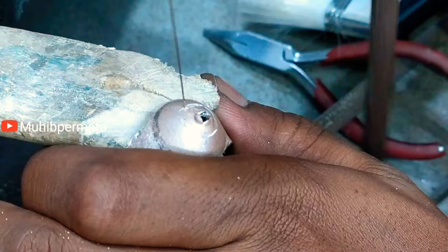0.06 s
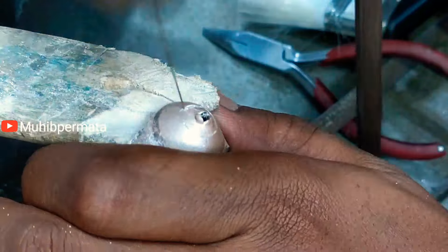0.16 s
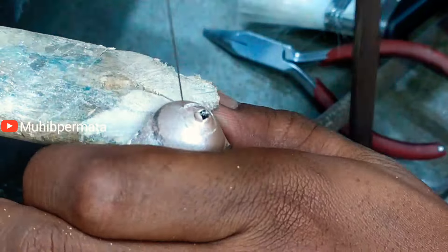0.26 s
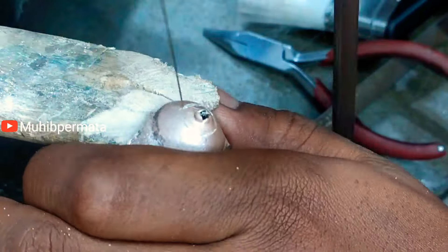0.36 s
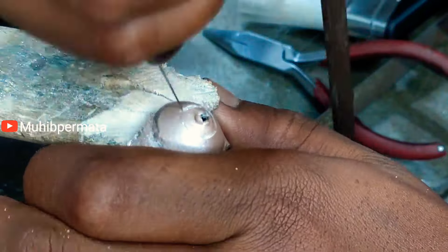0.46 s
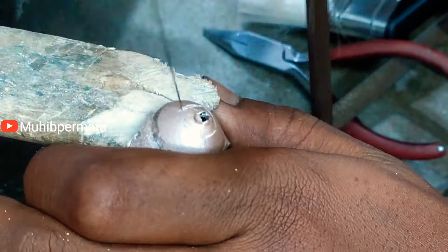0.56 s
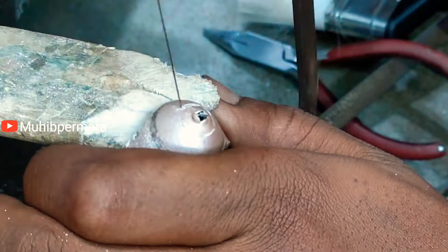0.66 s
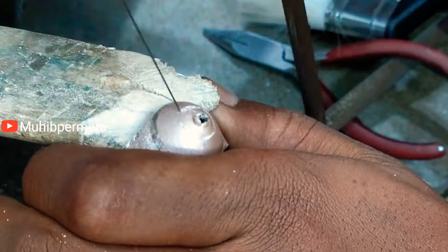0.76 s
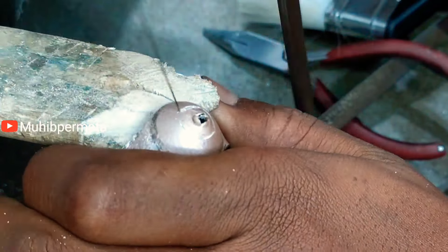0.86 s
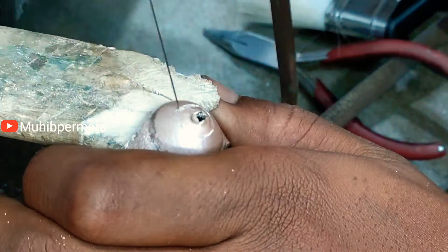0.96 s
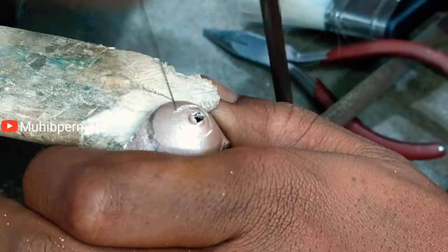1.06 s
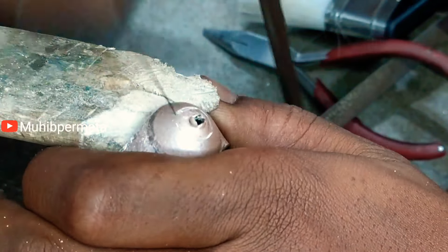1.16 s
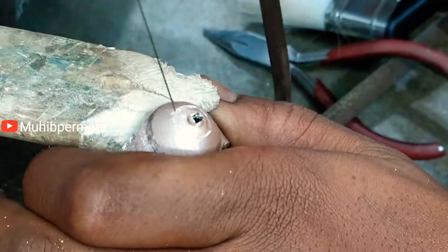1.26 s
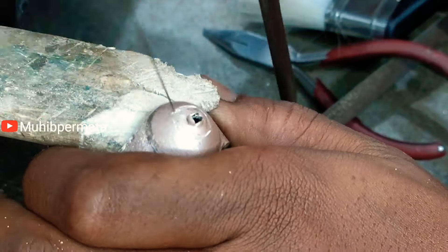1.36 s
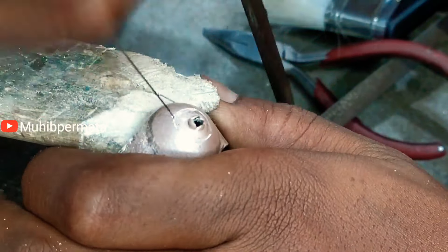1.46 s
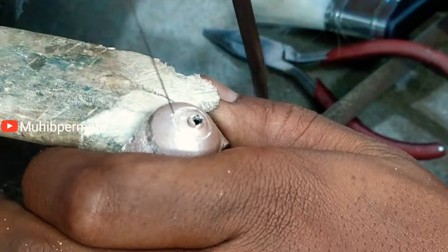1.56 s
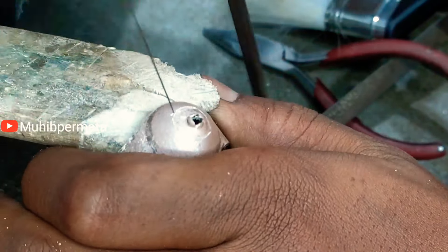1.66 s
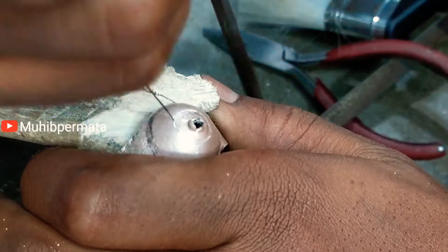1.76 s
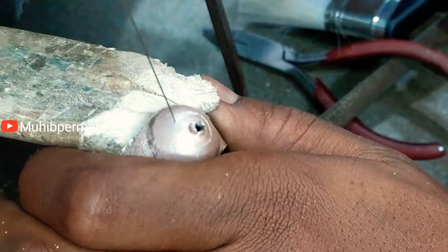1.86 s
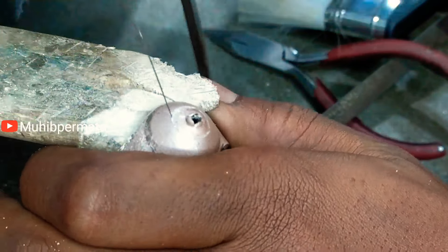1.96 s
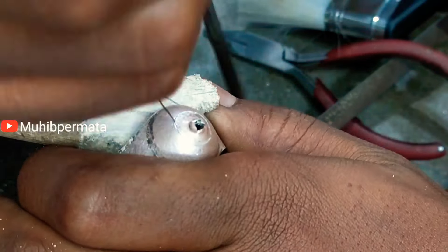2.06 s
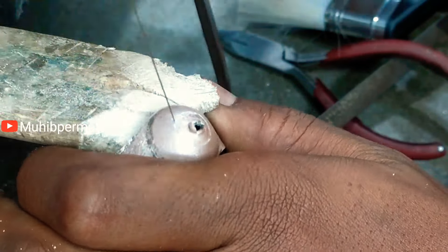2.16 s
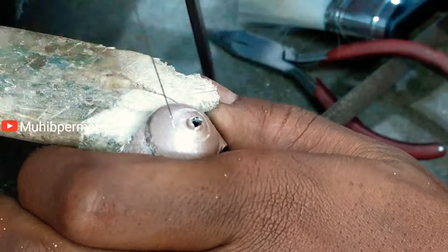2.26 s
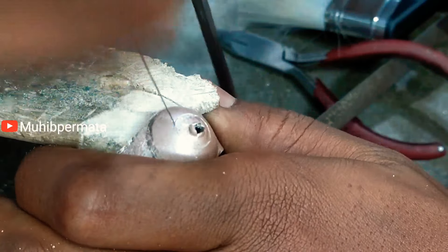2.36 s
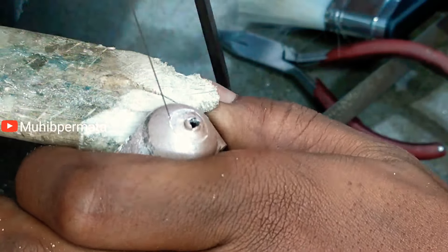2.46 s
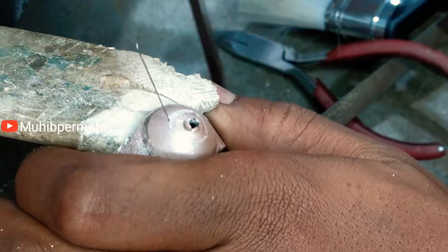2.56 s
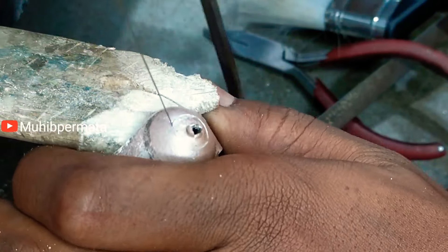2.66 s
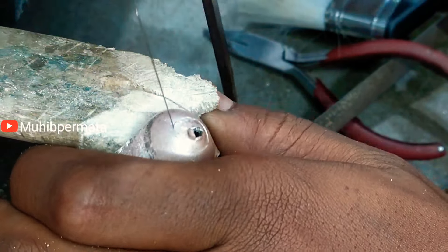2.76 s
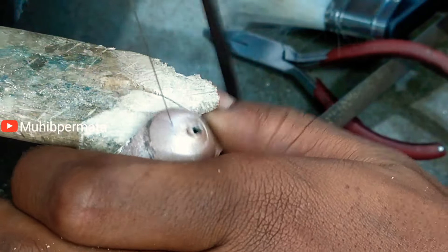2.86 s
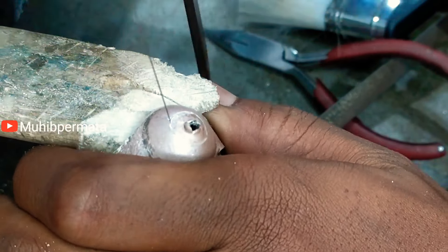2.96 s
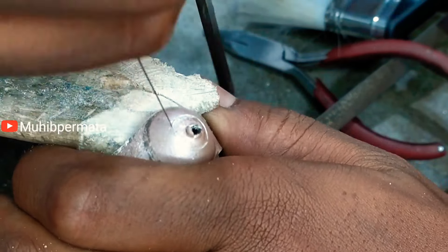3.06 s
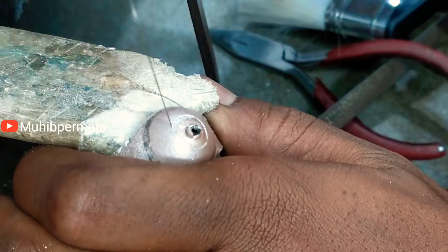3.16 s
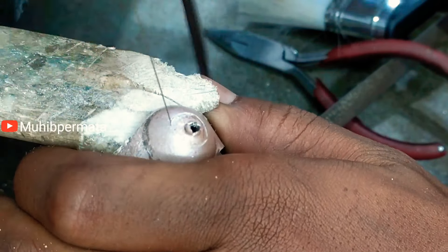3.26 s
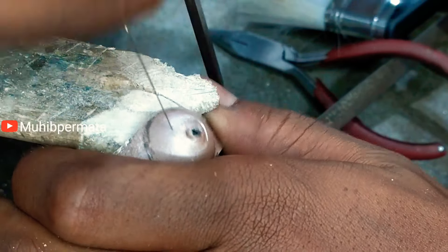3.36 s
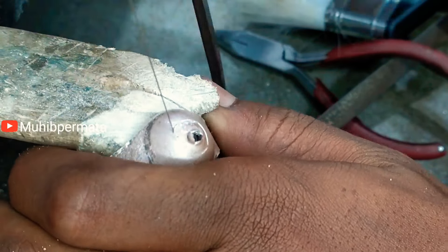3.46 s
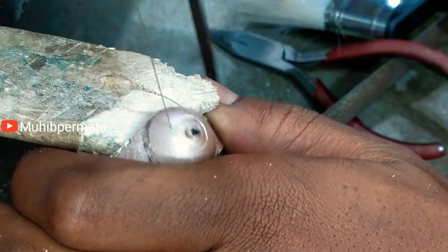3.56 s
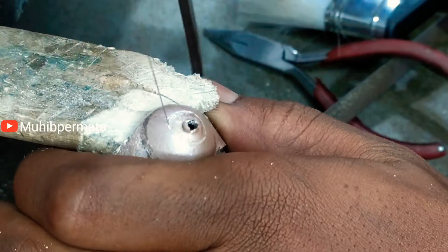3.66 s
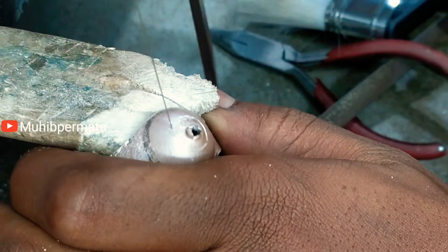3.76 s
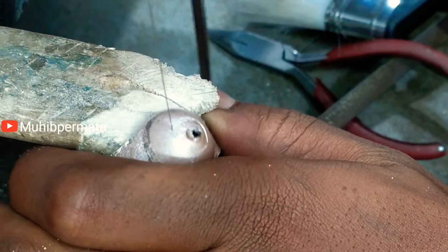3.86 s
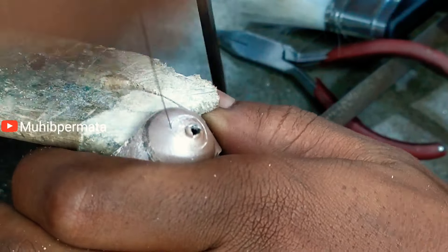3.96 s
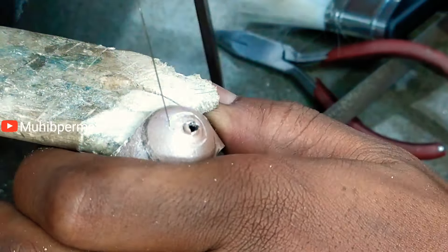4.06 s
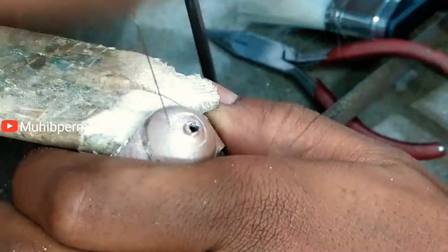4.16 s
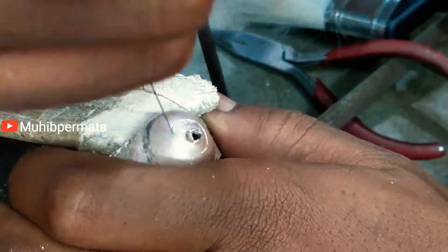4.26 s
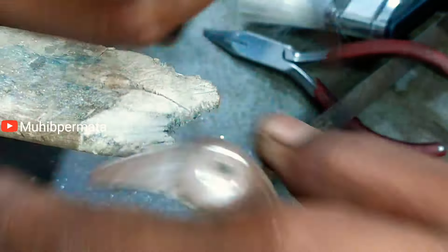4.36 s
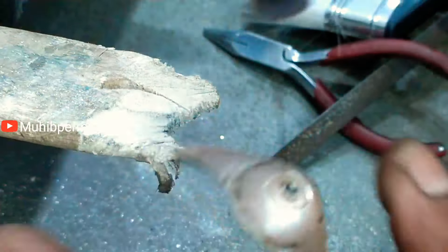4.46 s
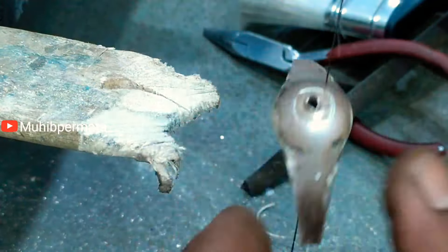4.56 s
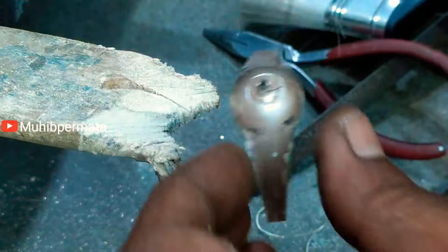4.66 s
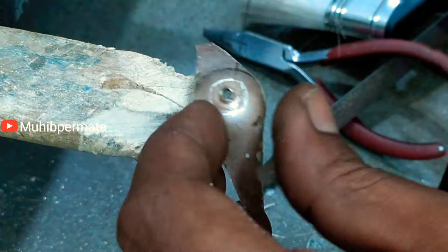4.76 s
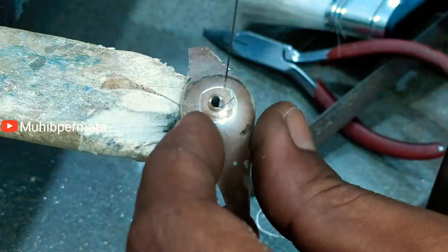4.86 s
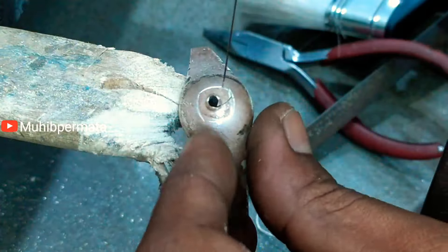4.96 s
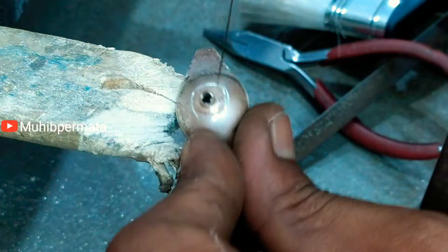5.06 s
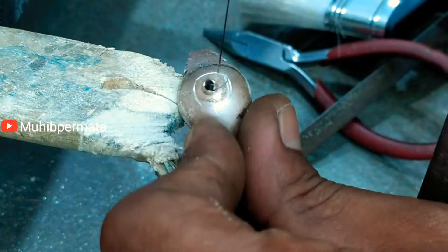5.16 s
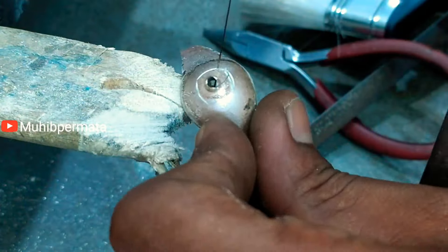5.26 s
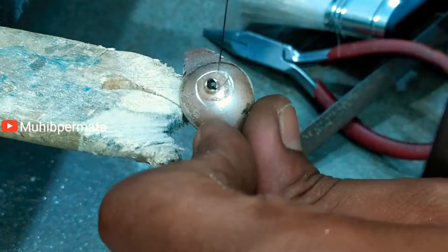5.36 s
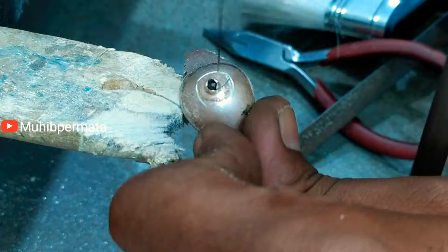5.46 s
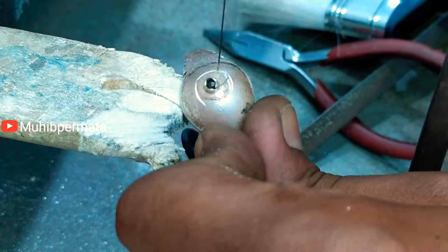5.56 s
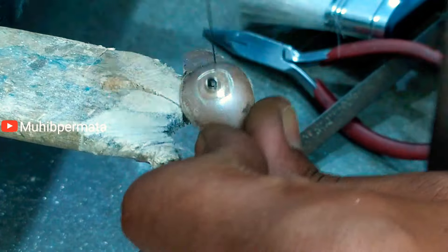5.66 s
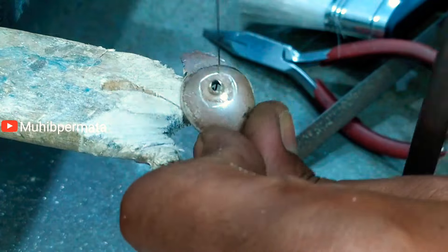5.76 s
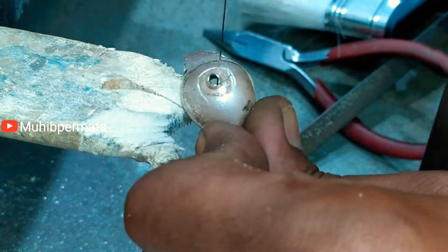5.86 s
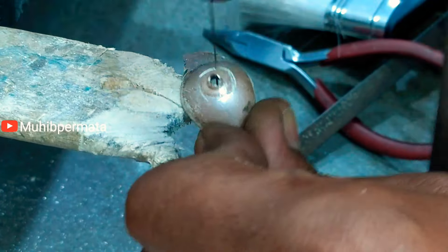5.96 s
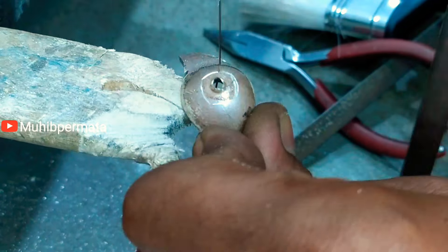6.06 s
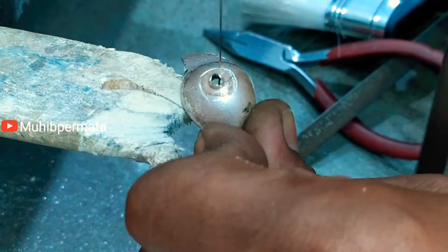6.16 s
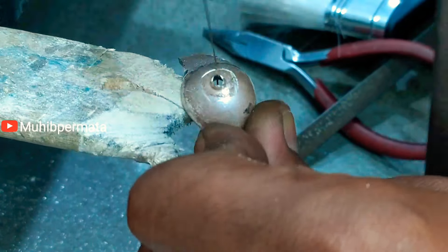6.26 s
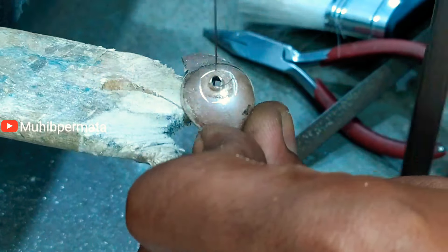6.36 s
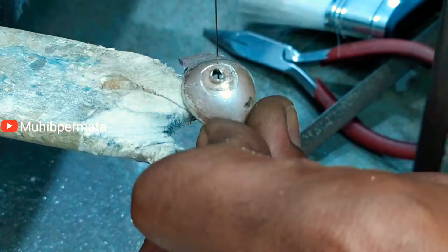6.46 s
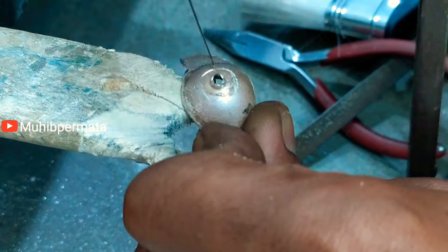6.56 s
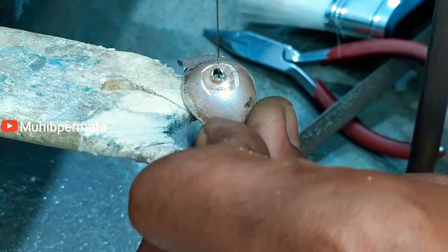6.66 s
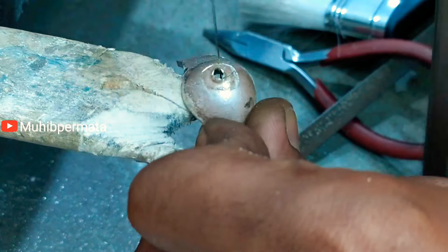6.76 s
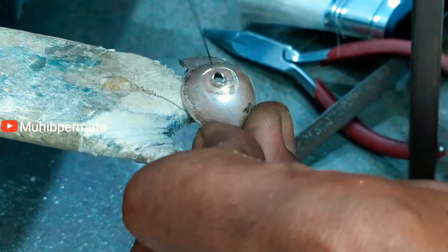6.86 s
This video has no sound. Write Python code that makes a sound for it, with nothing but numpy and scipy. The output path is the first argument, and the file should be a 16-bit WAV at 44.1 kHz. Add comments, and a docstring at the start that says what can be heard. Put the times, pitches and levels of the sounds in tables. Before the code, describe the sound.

A hand saw with tiny teeth rasps rapidly through silver, each stroke a gritty scrape with a hollow wooden knock and thin hiss. The quick opening spell breaks off, lighter scratchy strokes come and go, and a pause of about a second holds only faint scuffs. The last spell is strongest, with chirpy squeaks, and continues to the end. Very close stereo microphone in a quiet, softly humming workshop.

```python
"""Three spells of a jeweller's saw cutting silver on a wooden bench peg, close to a stereo microphone.
The first spell is quick and regular: teeth rasp, chips click and stick-slip knocks ring the peg's modes.
The tooth rate chirps up at each bite and down as the arm brakes. A second, shorter spell has lighter strokes;
after a pause with faint brushes of the blade, the third bites hard and squeals in many short glides.
Throughout, the flanks of the blade hiss, a short room tail answers, and filtered noise makes the workshop hum."""
import sys
import numpy as np
from scipy import signal
from scipy.fft import rfft, irfft, next_fast_len
from scipy.io import wavfile
from scipy.ndimage import uniform_filter1d, map_coordinates

SR = 44100
rng = np.random.default_rng(int(sys.argv[2]) if len(sys.argv) > 2 else 0)


def store_pcm(level_fs):
    """Save levels as 16-bit WAV."""
    pcm = np.round(np.clip(level_fs, -1, 1) * 32767).astype(np.int16)
    wavfile.write(sys.argv[1], SR, np.atleast_2d(pcm).T)


N = 304728

# Saw cycles, each a light return and then a cut; levels are relative:
# (bite time [s], bite level [dB], judder level [dB], rasp level [dB], return rasp level [dB],
#  tooth rate amid the bite chirp [Hz], delay from bite to brake catch [s], brake catch level [dB])
STROKES = [(.004, -38.5, -35, -44, -74, 706, 0.065, -30), (.126, -50, -32.5, -41, -52.5, 970, 0.043, -32.5),
           (.264, -28, -34, -41, -44, 862, 0.058, -31.5), (.414, -25, -29.5, -38.5, -43, 649, 0.044, -36),
           (.557, -19, -31.5, -40.5, -40.5, 815, 0.019, -23.5),
           (.692, -21.5, -32, -38, -44.5, 733.5, 0.055, -31),
           (.838, -28, -29.5, -36.5, -44, 728, 0.035, -36), (.988, -27, -31.5, -37, -45, 1160, 0.043, -34),
           (1.135, -22.5, -36, -37.5, -46.5, 822.6, 0.047, -30),
           (1.282, -23.5, -32, -39.5, -43, 1033, 0.017, -43),
           (1.429, -24.5, -33.5, -40.5, -46.5, 718, 0.04, -33),
           (1.570, -25, -33.5, -40.5, -45.5, 693, .036, -36),
           (1.721, -22, -35, -51, -48, 633.6, 0.023, -28.5),
           (1.874, -27.5, -40.5, -44, -68, 628, 0.038, -27.5),
           (2.028, -26, -30.5, -40.5, -51.5, 826, 0.044, -30.5),
           (2.177, -23.5, -33, -42.5, -50, 845, .028, -30.5), (2.336, -40, -76, -79, -55, 630, .013, -37),
           (2.472, -44, -89, -88, -77, 707, 0.02, -76), (2.87, -24.5, -33, -43.5, -58, 662, 0.037, -56),
           (3.021, -31.5, -37, -41.5, -55, 900, 0.026, -37), (3.170, -28, -31, -39, -55, 927, 0.042, -31),
           (3.318, -31.5, -45, -59, -51.5, 693, .017, -57), (3.562, -37, -46.5, -65, -82, 660, 0.048, -68),
           (3.796, -28, -35, -42.5, -67, 726, 0.047, -28.5),
           (3.933, -30.5, -36.5, -45, -47, 713, 0.037, -33.5),
           (4.075, -29, -35.5, -38.5, -52.5, 969, 0.034, -30),
           (4.224, -75, -80, -68, -75.5, 540, 0.049, -79), (5.286, -27, -31.5, -43, -51.5, 728, 0.056, -28),
           (5.446, -18, -27, -35, -44, 914, 0.026, -27.5),
           (5.603, -18.5, -23.5, -39.5, -45, 795.5, 0.038, -23),
           (5.765, -20, -27.5, -38, -51, 824, .044, -29.5), (5.928, -20, -28, -41, -51, 797, 0.015, -27),
           (6.064, -18.5, -28.5, -38.5, -54.5, 961, .033, -52),
           (6.220, -15.5, -26, -37.5, -54, 890, .038, -33), (6.375, -26.5, -28, -39, -51, 1048, 0.04, -23),
           (6.533, -35, -30.5, -37.5, -53.5, 1210, .036, -27),
           (6.692, -23.5, -29, -35, -50.5, 888, .041, -25), (6.839, -20, -29, -35.5, -43.5, 919, 0.04, -26)]


def amp(db):
    """Logarithmic level: decibels become an amplitude ratio."""
    return 10 ** (np.asarray(db) / 20)


def unit(x):
    """Power normalization: x scaled to rms 1."""
    return x / np.sqrt(np.mean(x ** 2) + 1e-20)


def steady(x, size=1400):
    """Short-time power normalization: rms near 1 over about size samples; faster grain stays."""
    power = np.mean(np.atleast_2d(x) ** 2, axis=0)
    smooth_power = uniform_filter1d(uniform_filter1d(power, size), size)
    return x / np.sqrt(np.abs(smooth_power) + 1e-12)


def along(points, hz):
    """Interpolation of (frequency [Hz], value) points on a logarithmic frequency axis."""
    f, v = np.transpose(points)
    return np.interp(np.log(hz + 1), np.log(f + 1), v)


def wobble(rate):
    """Band-limited random modulation: a smooth curve through rate random knots a second."""
    knots = rng.standard_normal(int(N * rate / SR) + 4)
    return map_coordinates(knots, [np.arange(N) * rate / SR])


def filtered(x, response):
    """Linear filtering: the spectrum of x times a complex response of frequency."""
    m = next_fast_len(N + SR // 2)
    return irfft(rfft(x, m) * response(np.fft.rfftfreq(m, 1 / SR)), m)[..., :N]


def add(track, s, piece):
    """Superposition: a piece is summed into a track at s seconds."""
    start = int(np.clip(round(s * SR), 0, N))
    track[start:start + len(piece)] += piece[:N - start]


def progress(length):
    """Normalized time: 0 to 1 over length seconds."""
    return np.linspace(0, 1, max(int(length * SR), 8))


def pulses(rate, scatter_db):
    """Integrated rate: a click at each whole count, with its own random size."""
    hit = np.diff(np.floor(np.cumsum(rate) / SR), prepend=0) > 0
    return hit * amp(scatter_db * np.clip(rng.standard_normal(N), -2, 2))


def arm(swell=0.75, judder_turn_db=-15, rasp_turn_db=-19, hiss_turn_db=-23):
    """Reciprocating motion: each pass swells in speed and force, then the blade nearly stops at the turn."""
    speed_crest = .62  # share of a pass at which the blade runs fastest
    turn_levels = (judder_turn_db, rasp_turn_db, hiss_turn_db)
    speed, force = np.zeros(N), np.zeros((3, N))  # force on judder, rasp and hiss
    moves = list(passes())
    paces = rng.uniform(.88, 1.08, len(moves))
    for (s, length, crest, hiss_crest, *levels), pace in zip(moves, paces):
        u = progress(length)
        speed_arch = np.sin(np.pi * np.interp(u, [0, speed_crest, 1], [0, .5, 1]))
        add(speed, s, pace * np.abs(speed_arch) ** .6)
        for track, db, peak, turn_db in zip(force, levels, (crest, crest, hiss_crest), turn_levels):
            arch = np.sin(np.pi * np.interp(u, [0, np.clip(peak, .1, .9), 1], [0, .5, 1]))
            press = np.abs(arch) ** swell + amp(turn_db)
            add(track, s, amp(db) * unit(press))
    return speed, uniform_filter1d(force, size=200)


def passes():
    """Stroke kinematics: each cycle as return and cut, then the stray brushes of the blade.

    Yields (time [s], length [s], force crest, hiss crest [shares], judder, rasp, hiss level [dB])."""
    # Spells of sawing: (begin [s], length of a cut [s], share of a cut at which the hiss peaks [1])
    spells = [(0, .073, 0.18), (2.6, .071, 0.72), (4.6, .079, .3)]
    # Fit of the blade in the cut, as levels against the rasp:
    # (time [s], hiss of the cut [dB], hiss of the return [dB], judder of the return [dB])
    binding = [(0, -9, -7, 6.5), (.55, -5.5, -7.5, 9.5), (1.2, -8, -12.5, 10), (2.3, -13, -11, 16),
               (2.85, -2, 8.5, 18), (3.25, -18, 8.5, 6.5), (3.9, 2.5, 0.5, 8.5), (4.2, -16, 14, 4),
               (5.28, -15, 4, 7.5), (5.45, -22, -10, 7), (5.6, -4, -14, 13.5), (5.8, -7, -3, 15.5),
               (6.3, -6, 6.5, 18.5), (6.9, -4.5, -2.5, 8.5)]
    # The blade brushes the piece: (time [s], length [s], relative rasp level [dB])
    brushes = [(1.805, .022, -64), (2.652, .03, -66.5), (2.78, .03, -64.5), (3.49, .035, -64.5),
               (3.779, .02, -70), (4.282, 0.046, -67), (4.418, 0.038, -73), (4.734, 0.052, -74),
               (4.904, .08, -70.5), (5.07, .02, -77), (5.207, 0.047, -53)]
    lead_s = .009  # the cut starts this long before its bite
    pause_s, restart_s = .12, .054  # after a gap of pause_s or more, the return is only a short lift
    cut_crest, return_crest = 0.29, 0.43  # share of a pass at which it presses hardest
    brush_judder_db, brush_hiss_db = 7.5, -0.5  # against the rasp
    fit = np.array(binding)
    turn = -1
    for s, _, judder_db, rasp_db, return_db, *_ in STROKES:
        _, cut_s, hiss_crest = spells[sum(s > row[0] for row in spells[1:])]
        cut_hiss_db, return_hiss_db, return_judder_db = (np.interp(s, fit[:, 0], c) for c in fit.T[1:])
        start = s - lead_s
        back = turn if start - turn < pause_s else start - restart_s
        yield (back, start - back, return_crest, return_crest,
               return_db + return_judder_db, return_db, return_db + return_hiss_db)
        yield start, cut_s, cut_crest, hiss_crest, judder_db, rasp_db, rasp_db + cut_hiss_db
        turn = start + cut_s
    for s, length, db in brushes:
        yield s, length, return_crest, return_crest, db + brush_judder_db, db, db + brush_hiss_db


def catches():
    """Static friction: the teeth catch at the bite of each cut, at its brake, and at stray jolts.

    Rows are (time [s], relative level [dB], tooth rate [Hz], +1 speeding up or -1 slowing)."""
    # Stray catches that jolt the piece on the peg, and a few low handling rubs in the pause: (time [s],
    # relative level [dB])
    jolts = [(0.341, -29), (0.666, -31), (.962, -32), (1.25, -34), (1.335, -46), (1.394, -39),
             (1.539, -29.5), (1.640, -29.5), (1.69, -32.5), (1.94, -35.5), (1.987, -34.5), (2.134, -51),
             (2.249, -43), (2.706, -54.5), (2.823, -44), (2.958, -46), (2.984, -42), (3.079, -36.5),
             (3.111, -48), (3.269, -39), (3.513, -48), (3.884, -52), (3.911, -58), (3.997, -36),
             (4.022, -37.5), (4.69, -52), (4.92, -62), (4.955, -62), (5.16, -50), (5.2, -44), (5.425, -34),
             (5.55, -29.5), (5.697, -36), (5.731, -27), (5.862, -31), (5.874, -29), (6.046, -36),
             (6.156, -52), (6.2, -28), (6.46, -36.5), (6.621, -34), (6.892, -27.5)]
    jolt_hz, brake_hz = 763.8, 855.6  # tooth rate amid the chirp
    cuts = [(s, bite_db, bite_hz, 1) for s, bite_db, _, _, _, bite_hz, *_ in STROKES]
    brakes = [(s + brake_s, brake_db, brake_hz, -1) for s, *_, brake_s, brake_db in STROKES]
    return cuts + brakes + [(s, db, jolt_hz, -1) for s, db in jolts]


def bites(rise=0.17, fall=2.08, first_slip=1.45):
    """Stick and release: a catch loads fast and lets go more slowly; a hard slip marks the break."""
    bite_s = .015  # time scale of rise and fall
    catch_lead_s = 0.0019  # the teeth dig in this long before they break free
    force, breaks = np.zeros(N), np.zeros(N)
    u = 2 * progress(2 * bite_s)
    catch = np.minimum(u / rise, 1) * np.exp(-fall * u ** 2)
    for s, db, *_ in catches():
        add(force, s - catch_lead_s, amp(db) * catch)
        add(breaks, s, np.array([first_slip]))
    return force, breaks


def judder(rub, bite, slips, hardness_db, weight_db, soft_hz=520, low_hz=320, rub_db=-2.0, bite_db=0.56):
    """Stick-slip excitation: uneven knocks ring the peg; a firm grip and a hard bite brighten them."""
    slips = filtered(slips, lambda hz: hz / (hz + 60))
    drive = steady(unit(slips) + 0.38 * rng.standard_normal(N), size=260)
    bite_force = amp(bite_db) * bite
    force = np.hypot(amp(rub_db + 1.0 * wobble(60)) * rub, bite_force)
    bright = amp(hardness_db - 8.5 + 8.7 * bite_force / (force + 1e-9))
    soft = filtered(drive, lambda hz: 1 / (1 + (hz / soft_hz) ** 4))
    low = filtered(drive, lambda hz: 1 / (1 + (hz / low_hz) ** 8))
    knocks = soft + bright * (drive - soft) + (amp(weight_db) - 1) * low
    # the force sets how far the peg swings, however the knocks happen to fall
    swing_power = filtered(knocks, peg) ** 2
    smooth_power = uniform_filter1d(uniform_filter1d(swing_power, size=800), size=800)
    swing = np.sqrt(np.abs(smooth_power) + 1e-12)
    return peg_ring(force * knocks / swing)


def peg(hz):
    """Modal summation: the resonances of the peg, bench and saw frame, with alternating sign."""
    # Modes: (frequency [Hz], bandwidth [Hz], relative level [dB])
    modes = [(131.7, 10.2, -18.5), (175.2, 15.3, -12), (259.8, 9.5, -8), (276.5, 5.5, -3), (319.6, 17, 0.5),
             (354.5, 23.4, -1.5), (416.4, 20, -8), (463, 5, -9), (541.7, 11.6, -5.5), (560, 15.3, -6.5),
             (626.3, 67.5, 0), (710, 62.3, 1.5), (740.2, 51, 2), (872.4, 52.5, -2.5), (895.3, 64.6, -3.5),
             (1104, 21.5, -5.5), (1123, 17, -18), (1307, 163, -18.5), (1380, 46.5, -6.5), (1577, 110, -9.5),
             (1615, 72, -10), (1776, 38, -13.5), (1988, 110, -17)]
    return sum((-1) ** k * amp(db) * 1j * hz * width / (fc * fc - hz * hz + 1j * hz * width)
               for k, (fc, width, db) in enumerate(modes))


def ports(hz):
    """Interaural-like differences: level and phase of the peg's sound at the two microphone ports."""
    # (frequency [Hz], left minus right [dB], phase lead of the left [rad])
    differences = [(130, -2, 0.17), (247, -0.5, 0), (300, -3.5, 0), (448, 0, 0.5), (577, 1.5, 0.4),
                   (800, 0, -0.5), (945, 2.5, 0), (1018, 4.5, 2), (1220, 7, -1.2), (1424, 10, -1.5),
                   (1760, -3, -2), (2000, -2.5, -2.5)]
    table, side = np.array(differences), np.array([[.5], [-.5]])
    level_db, lead = along(table[:, :2], hz), along(table[:, ::2], hz)
    return amp(side * level_db) * np.exp(1j * side * lead)


def peg_ring(drive, spread=0.024):
    """Shifted resonance: the fingers and the blade move the peg's modes a little over time."""
    seat = np.clip(wobble(7), -1, 1)
    # crossfade between modes tuned low, centred and high
    shares = {step: np.sqrt(np.clip(1 - np.abs(seat - step), 0, 1)) for step in (-1, 0, 1)}
    ring = sum(share * filtered(drive, lambda hz: peg(hz / (1 + step * spread)) * ports(hz))
               for step, share in shares.items())
    return ring / np.sqrt(sum(shares.values()))


def chatter(chatter_db=-1.5, centre_s=0.00596, waver=0.059, second_db=-13):
    """Frequency sweep: single teeth knock in a chirp, up at a bite and down at a brake or jolt."""
    chatter_s, sweep_per_s = .034, 62  # chirp length; its rate changes by this share a second
    track, u = np.zeros(N), progress(chatter_s)
    t = (u - .5) * chatter_s
    for s, db, hz, direction in catches():
        jitter = unit(uniform_filter1d(rng.standard_normal(len(u)), size=40))
        rate = hz * np.exp(direction * sweep_per_s * t) * (1 + waver * jitter)
        phase = 2 * np.pi * np.cumsum(rate) / SR
        knocks = np.sin(phase) + amp(second_db) * np.sin(2 * phase)
        add(track, s + centre_s - chatter_s / 2, amp(db + chatter_db) * knocks * np.hanning(len(u)) ** 2)
    return .75 * peg_ring(track) + .55 * track  # through the peg, and direct


def silver(x, spectrum, t60):
    """Dense modal decay: hand-damped metal, struck at a new spot each stroke and unlike at each port."""
    t, out = np.arange(SR // 16) / SR, np.zeros((2, N))
    edges = [0] + [int(row[0] * SR) for row in STROKES[1:]] + [N]
    for start, end in zip(edges, edges[1:]):
        for port in out:
            modes = rfft(rng.standard_normal(len(t)) * amp(-60 * t / t60))
            # neighbouring modes share the energy evenly; the broad colour is the spectrum's
            local_power = uniform_filter1d(np.abs(modes) ** 2, size=45)
            ring = irfft(modes / np.sqrt(np.abs(local_power) + 1e-12), len(t))[:len(t) // 2]
            add(port, start / SR, signal.fftconvolve(x[start:end], ring / np.linalg.norm(ring)))
    return filtered(out, lambda hz: amp(along(spectrum, hz)))


def patchy(x, depth_db):
    """Time-varying spectrum: the colour changes from moment to moment as the contact point moves."""
    z = signal.stft(x, nperseg=512)[2]
    field = uniform_filter1d(rng.standard_normal(z.shape[-2:]), size=4, axis=0)
    field = uniform_filter1d(field, size=7, axis=1)
    return signal.istft(z * amp(depth_db * unit(field)), nperseg=512)[1][..., :N]


def rasp(force, tooth_hz, rasp_db=-1.5, grit=0.99):
    """Periodic excitation: teeth tear at the metal; flutter bunches them, even spacing leaves a tone."""
    # Silver and blade under the teeth, one colour a spell: deep in the cut, on light strokes, near
    # the edge; each is (frequency [Hz], relative level [dB])
    deep_colour = [(500, -37), (1300, 9), (1900, 2.5), (2300, -0.5), (2700, 2), (3400, -7.5), (4100, 4.5),
                   (4600, -1.5), (5400, -3), (6300, -19), (8000, -14.5), (16000, -16.5)]
    light_colour = [(500, -20), (1150, 14), (1900, 10), (2300, 1.5), (2850, 5.5), (3300, -8), (4200, -16),
                    (6300, -12), (8000, -15), (16000, -42)]
    edge_colour = [(500, -38), (1300, 6), (1900, -2.5), (2300, -2.5), (2600, 7), (3400, 0), (4100, 7),
                   (4700, -19), (5250, 5.5), (5900, -12), (7000, -6.5), (8500, -18), (16000, -44)]
    rate = tooth_hz * amp(.55 * wobble(700))
    even = .25 * amp(2 * wobble(26))
    tone = np.sin(2 * np.pi * np.cumsum(rate) / SR)
    teeth = unit(pulses(rate, scatter_db=12.0)) + even * tone
    gritty = teeth + grit * rng.standard_normal(N)
    tearing = patchy(gritty * amp(0.8 * wobble(330)), depth_db=2)
    spell = np.searchsorted([2.6, 4.6], np.arange(N) / SR)  # starts of the later spells [s]
    rings = [silver(tearing, colour, t60=0.011) for colour in (deep_colour, light_colour, edge_colour)]
    ring = np.choose(spell, rings)
    snag = amp(2.2 * wobble(110) + 2.4 * wobble(420) - .9)
    return amp(rasp_db) * force * snag * steady(ring)


def chips(force, slips):
    """Impulsive fracture: each slip breaks a chip off with a crisp click; a few are much larger."""
    # A chip breaking off the silver: (frequency [Hz], relative level [dB])
    chip_colour = [(600, -27), (1600, -4), (2800, -0.5), (3400, -3), (4000, 4.5), (4700, -5.5), (7000, -10),
                   (16000, -22.5)]
    sizes = slips * amp(3.5 * np.clip(rng.standard_normal(N), -2, 2))
    return force * steady(silver(sizes, chip_colour, t60=.005))


def hiss(force, top_db, hiss_db=-1, top_hz=11500):
    """Friction noise: blade flanks scrape the walls of the cut; the blade's fit sets the very top."""
    # (frequency [Hz], relative level [dB])
    wall_colour = [(2000, -34), (5500, -5.5), (7500, -6.5), (9500, -6), (10800, -3.5), (12000, -5.5),
                   (14200, 2.5), (15300, 3), (16000, -12.5)]
    flicker = amp(1.14 * wobble(450) + 3.1 * wobble(90))
    scrape = patchy(rng.standard_normal(N) * flicker, depth_db=4.0)
    wash = amp(hiss_db) * force * steady(silver(scrape, wall_colour, t60=0.0019))
    top = filtered(wash, lambda hz: 1 - 1 / (1 + (hz / top_hz) ** 12))
    return wash + (amp(top_db) - 1) * top


def sings(second_db=-17, third_db=-20, apart=1.66):
    """Frequency-modulated harmonics: the blade squeals in rough glides, apart in phase [rad] at the ports."""
    # Squeals and rings: glides of the teeth, the blade's own ring near 1.1 kHz at some bites, and a faint rub
    # near 3.5 kHz: (time [s], length [s], start pitch [Hz], middle pitch [Hz], end pitch [Hz], relative level
    # [dB], random pitch waver as a share [1])
    squeals = [(.217, 0.045, 3850, 2950, 1900, -50, 0.078), (.277, .028, 2540, 3340, 3940, -43.5, 0.086),
               (.495, 0.034, 2240, 3120, 4030, -37, 0.16), (1.142, 0.024, 1038, 1078, 1075, -31.5, 0.023),
               (1.279, 0.027, 1093, 1070, 1080, -28, 0.022), (2.874, 0.023, 1003, 1070, 1050, -29.5, 0.032),
               (4.923, 0.062, 3350, 3510, 3470, -68.5, 0.075),
               (5.224, 0.0238, 6840, 6980, 6660, -34.5, .04),
               (5.226, 0.051, 2470, 2490, 2420, -51.5, 0.033), (5.372, .052, 1890, 2600, 2620, -50, .03),
               (5.773, .026, 2650, 3943, 4883, -41, 0.069), (5.944, 0.032, 3340, 4593, 5430, -48, 0.072),
               (5.98, 0.032, 2900, 4400, 5700, -57, .06), (6.02, 0.053, 3940, 2686, 910, -48, 0.087),
               (6.078, .036, 2690, 3865, 5430, -45, .07), (6.097, 0.034, 3231, 3000, 2010, -43, 0.11),
               (6.178, 0.027, 6000, 4000, 1090, -45, 0.11), (6.226, 0.021, 1900, 2930, 3700, -38, .1),
               (6.25, 0.023, 3610, 3200, 2210, -37.5, 0.13), (6.376, .05, 1156, 2410, 895, -44, .1),
               (6.536, 0.035, 2420, 3580, 1800, -39, 0.083), (6.656, 0.034, 2460, 1640, 900, -44, .11),
               (5.449, 0.043, 1059, 1104, 1030, -24.5, 0.04),
               (5.471, 0.01518, 3590, 4080, 4430, -34, 0.081),
               (5.622, 0.03435, 1342, 1499, 1500, -32.5, 0.078),
               (5.767, 0.031, 1078, 1083, 1060, -25.5, 0.031), (6.531, 0.032, 1346, 1436, 1460, -31, 0.072),
               (6.697, .035, 1117, 1063, 1036, -26, .03), (6.734, 0.011, 1400, 1493, 1540, -26, 0.045),
               (6.733, .03, 3630, 3440, 3350, -40.5, .05), (6.759, 0.048, 1107, 1333, 1390, -32.5, 0.03),
               (6.787, 0.054, 1535, 1592, 1450, -30, 0.085), (6.772, 0.04, 2930, 2960, 2600, -35, 0.054),
               (6.776, 0.048, 4200, 4466, 4300, -43.5, 0.02), (6.81, 0.034, 2570, 2594, 2540, -42, 0.018),
               (6.845, 0.081, 1535, 1500, 1470, -35.5, 0.06), (6.854, 0.1, 3060, 3070, 3120, -35, 0.025)]
    whistle = np.zeros(N)
    for s, length, start_hz, middle_hz, end_hz, db, waver in squeals:
        u = progress(length)
        jitter = uniform_filter1d(rng.standard_normal(len(u)), size=30)
        glide = np.polyval(np.polyfit([0, .5, 1], [start_hz, middle_hz, end_hz], 2), u)
        phase = 2 * np.pi * np.cumsum(glide * (1 + waver * unit(jitter))) / SR
        tone = np.sin(phase) + amp(second_db) * np.sin(2 * phase) + amp(third_db) * np.sin(3 * phase)
        add(whistle, s, amp(db) * unit(tone * np.sin(np.pi * u)))
    rough = whistle * amp(4 * wobble(800) - 2)
    side = np.array([[.5], [-.5]])
    return filtered(rough, lambda hz: np.exp(1j * apart * side) / (1 + (hz / 7000) ** 4))


def ticks(tick_db=-5, rise=0.21):
    """Enveloped noise: bright, thin contacts; a short one clicks, a long one swells like a scuff."""
    # The blade snaps or scuffs against the edge of the cut: (time [s], relative level [dB], t60 [s])
    snaps = [(0.342, -28, .012), (0.82, -22, 0.0098), (.841, -36, .012), (0.873, -21, 0.031),
             (0.979, -23.5, 0.014), (1.13, -29, 0.0081), (1.272, -24, 0.013), (2.3196, -35, .01),
             (2.348, -36, 0.011), (2.7074, -27, 0.011), (2.828, -26, 0.079), (2.963, -27, .04),
             (2.981, -28, 0.034), (3.118, -25.5, 0.041), (3.147, -30, 0.011), (3.4265, -39, 0.012),
             (3.554, -40, 0.041), (3.668, -45.5, 0.031), (3.929, -27, 0.027), (4.033, -26, 0.084),
             (4.54, -39.5, 0.0063), (5.325, -25, 0.06), (5.444, -22, 0.079), (6.488, -24, 0.051),
             (6.527, -20, 0.09)]
    track, t = np.zeros(N), np.arange(SR // 7) / SR
    for s, db, t60 in snaps:
        shape = amp(-60 * t / t60) * (1 - np.exp(-t / (rise * t60)))
        add(track, s, amp(db + tick_db) * shape / shape.max() * rng.standard_normal(len(t)))
    return silver(track, [(500, -18.5), (2500, -8.0), (7000, -10.5), (12000, -7.5), (15000, -4)], t60=0.0026)


def room(x):
    """Exponential reverberation: the small workshop's short noise tail, one for each port."""
    # (frequency [Hz], t60 [s])
    decay = [(200, 0.53), (1000, 0.3), (4000, 0.64), (14000, 0.29)]
    hz, t, z = signal.stft(rng.standard_normal((2, SR // 2)), SR, nperseg=256)
    tail = signal.istft(z * amp(-60 * t / along(decay, hz)[:, None]), SR, nperseg=256)[1]
    delayed = np.pad(tail / np.linalg.norm(tail[0]), ((0, 0), (300, 0)))  # 300 samples late
    wet = signal.fftconvolve(x, delayed, axes=1)[:, :N]
    return diffuse(wet)


def diffuse(pair):
    """Spatial coherence: sound from all sides is most alike at the ports in the low mids, less elsewhere."""
    # (frequency [Hz], left-right likeness [1])
    likeness = [(30, 0.22), (70, 0.17), (150, 0.76), (700, 0.97), (1300, 0.18), (15000, 0.14)]
    turn = lambda hz: np.arccos(np.clip(along(likeness, hz), -1, 1)) / 2
    mid, side = filtered(pair, lambda hz: np.array([np.cos(turn(hz)), np.sin(turn(hz))]))
    return np.array([mid + side, mid - side])


def background(air_db=-63.5, hum_db=-68):
    """Spectrally shaped noise: quiet workshop air that drifts slightly, and a low, narrow drone."""
    # Workshop air: (frequency [Hz], relative spectral level [dB])
    air_colour = [(13, -30.5), (22, 0.5), (124, -19), (352, -14), (625, -16.5), (758, -23.5), (918, -21.5),
                  (1390, -28), (2090, -34), (2990, -33), (3430, -38.5), (4900, -40.5), (8710, -42),
                  (12100, -39.5), (15500, -35)]
    # Drone bands: (frequency [Hz], relative level [dB])
    drone_bands = [(283, -2), (325, 3), (357, -1), (404, -1), (532, -9.5)]
    air = diffuse(filtered(rng.standard_normal((2, N)), lambda hz: amp(along(air_colour, hz))))
    drone = filtered(rng.standard_normal(N),
                     lambda hz: sum(amp(db) / (1 + ((hz - fc) / 4) ** 2) for fc, db in drone_bands))
    drift = amp(.7 * wobble(7))
    return amp(air_db) * drift * unit(air) + amp(hum_db) * unit(drone)


def scene(slip_rate=430):
    """Superposition: the saw at the peg, the room's answer and the background."""
    # How the piece is held and sawn: (time [s], nominal tooth rate [Hz], contact hardness [dB],
    # weight of the low knocks [dB], chips against the rasp [dB], top of the hiss [dB])
    grip = [(0, 5098, -2.5, 0.5, -6.5, -7), (1.2, 5211, -2.5, 1.5, -9.5, -7),
            (1.75, 4800, -10.5, -2.5, -7.5, -6), (2.15, 4475, -2.5, -1.5, -7, -2),
            (2.449, 4200, -8.5, 6.5, -0.5, 5), (2.8, 3210, -5.5, 2.5, -2.5, 3),
            (4.2, 3180, -7.5, -5, -9.5, -3), (5.2, 3599, -2, -5, -1, -6.5), (6.9, 3396, 3, 1, -13.5, -2.5)]
    speed, (rub, tear, scrape) = arm()
    s, *columns = np.transpose(grip)
    now = np.arange(N) / SR
    tooth_hz, hardness_db, weight_db, chip_db, top_db = (np.interp(now, s, c) for c in columns)
    bite, breaks = bites()
    slips = pulses(slip_rate * amp(5 * wobble(260)), scatter_db=1.5)
    saw = judder(rub, bite, slips + breaks, hardness_db, weight_db)
    saw = saw + chatter()
    saw = saw + rasp(np.hypot(tear, amp(-28.5) * bite), tooth_hz * (speed + .03))
    saw = saw + chips(amp(chip_db) * np.hypot(tear, amp(-16) * bite), slips)
    saw = saw + hiss(np.hypot(scrape, amp(-31) * bite), top_db)
    saw = saw + sings() + ticks()
    return saw + amp(-12) * room(saw) + background()


def record(dry, top_hz=15900):
    """Band limitation: nothing is kept from top_hz upward."""
    return filtered(dry, lambda hz: hz < top_hz)


dry = scene()
out = record(dry)
store_pcm(out)
```